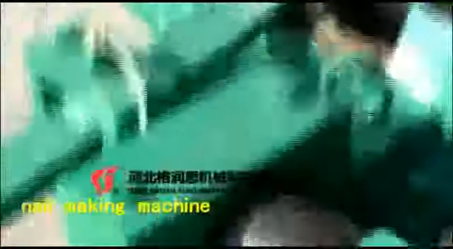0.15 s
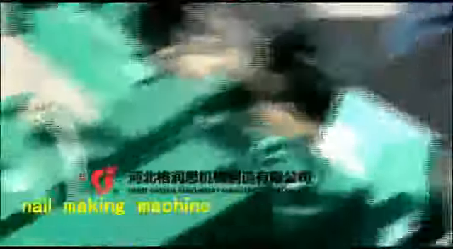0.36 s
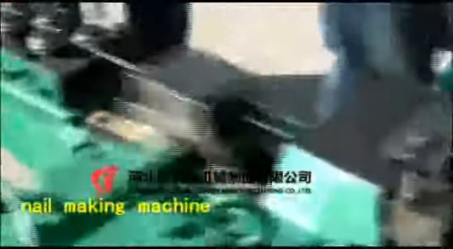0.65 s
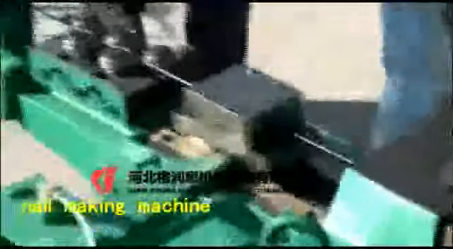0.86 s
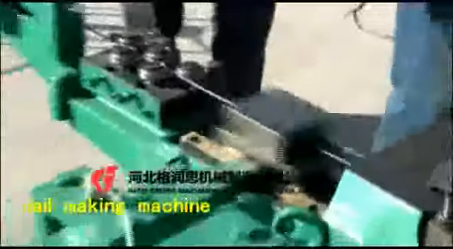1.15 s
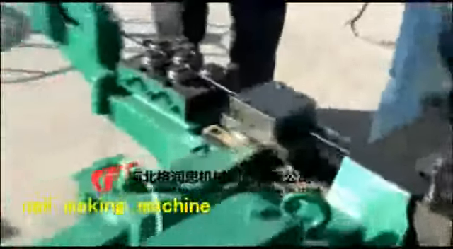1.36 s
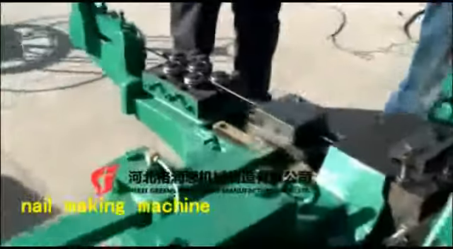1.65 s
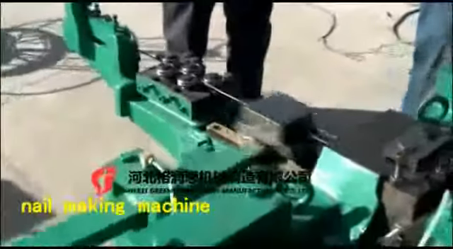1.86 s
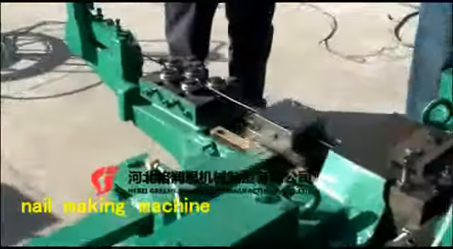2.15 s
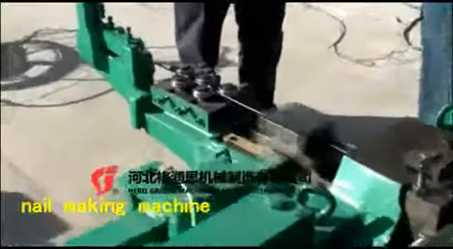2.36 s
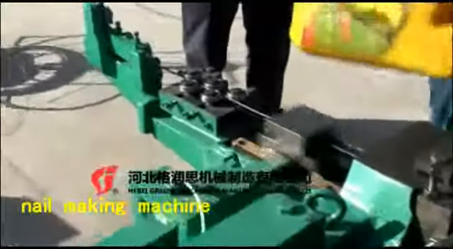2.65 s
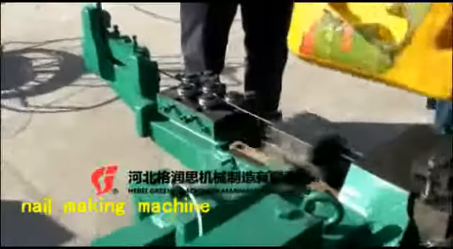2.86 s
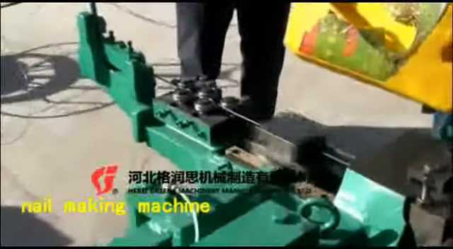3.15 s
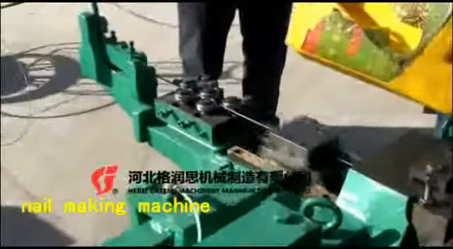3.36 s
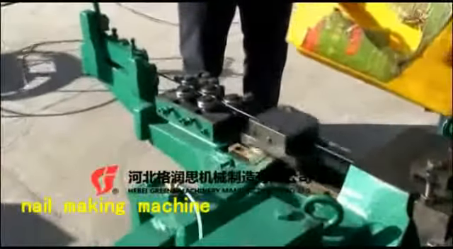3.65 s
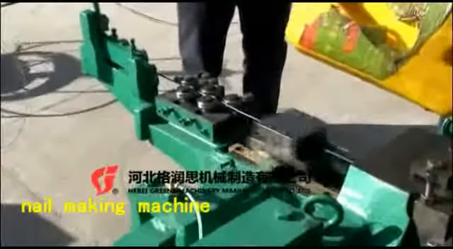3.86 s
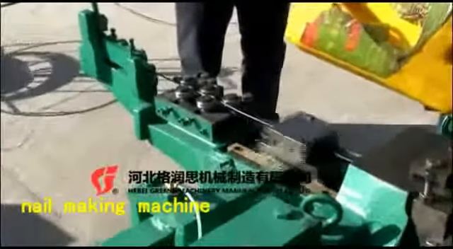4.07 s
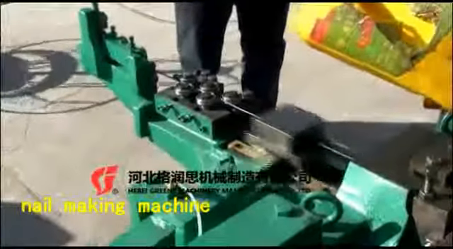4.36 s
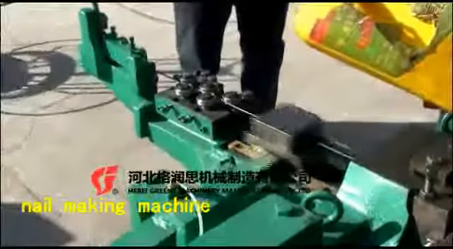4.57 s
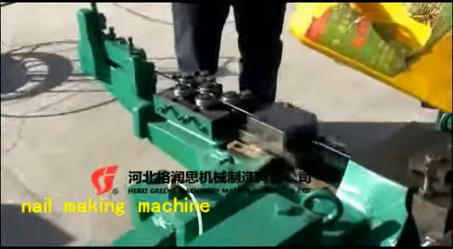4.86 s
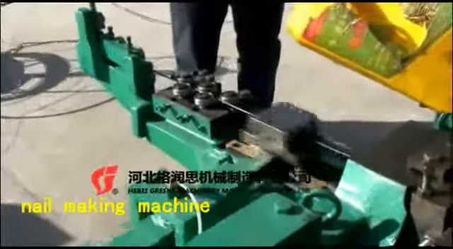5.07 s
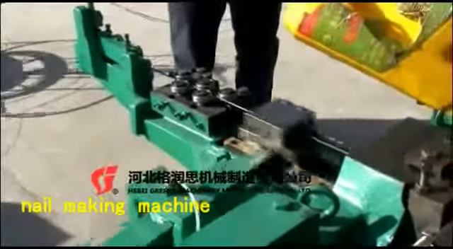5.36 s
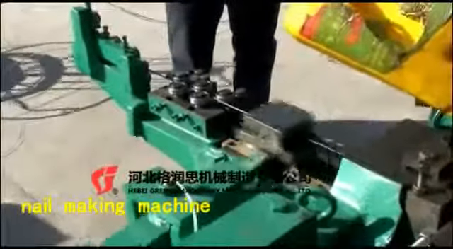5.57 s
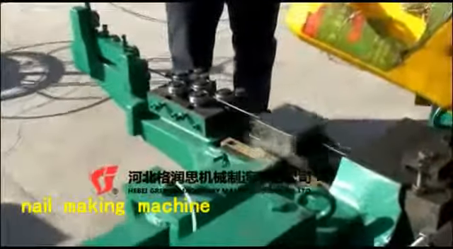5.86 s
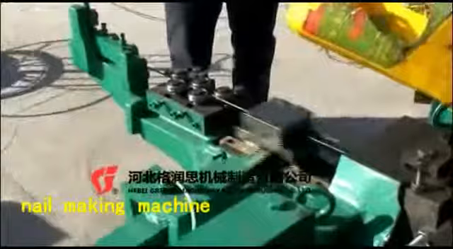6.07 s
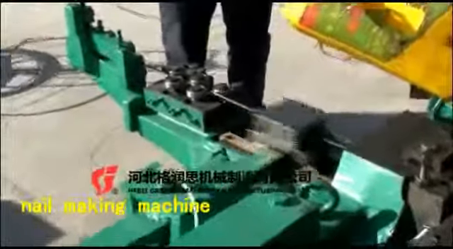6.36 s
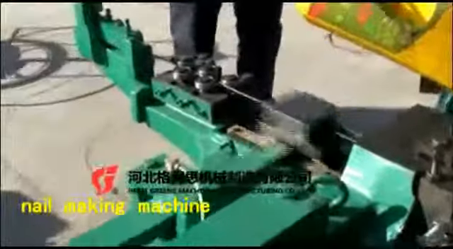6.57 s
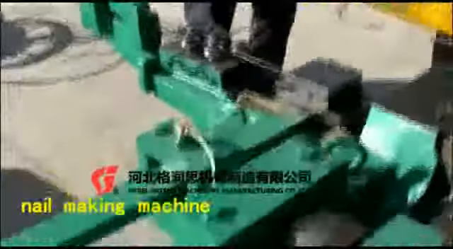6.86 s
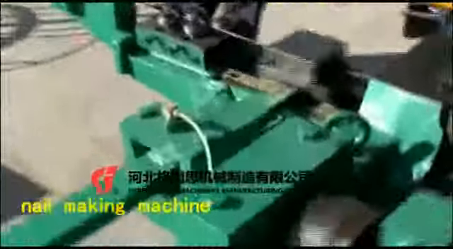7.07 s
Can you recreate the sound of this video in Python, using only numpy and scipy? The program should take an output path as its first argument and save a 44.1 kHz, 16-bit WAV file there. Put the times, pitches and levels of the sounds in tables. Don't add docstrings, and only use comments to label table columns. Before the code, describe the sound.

A wire nail machine clatters steadily outdoors, about four hard punch-and-snip cycles a second over rattling gears, whining rollers and rumbling wind.

```python
import sys
import numpy as np
from scipy import signal
from scipy.fft import rfft, irfft
from scipy.io import wavfile
from scipy.ndimage import uniform_filter1d

SR = 44100
rng = np.random.default_rng(int(sys.argv[2]) if len(sys.argv) > 2 else 0)


def int16_out(signal):
    q = np.round(np.clip(np.atleast_2d(signal).T, -1, 1) * 32767)
    wavfile.write(sys.argv[1], SR, q.astype(np.int16))


def magnitude_from_level(level_db):
    exponent = np.asarray(level_db, float) / 20
    return 10 ** exponent


N = 318843
HZ = np.fft.rfftfreq(N, 1 / SR)
T = np.arange(N) / SR
TURN_S = .2360


def evened(x):
    return x / np.sqrt(np.mean(x ** 2) + 1e-20)


def read(points, hz):
    f, value = np.transpose(points)
    return np.interp(np.log(hz + 1), np.log(f + 1), value)


def shaped_noise(points):
    return evened(irfft(rfft(rng.standard_normal(N)) * magnitude_from_level(read(points, HZ)), N))


def wander(rate_hz):
    return evened(irfft(rfft(rng.standard_normal(N)) / (1 + (HZ / rate_hz) ** 2), N))


def add(mix, s, sound):
    at = round(s * SR)
    part = mix[max(at, 0):][:max(len(sound) + min(at, 0), 0)]
    part += sound[max(-at, 0):][:len(part)]


def resonate(x, hz, width):
    turn = np.exp(2j * np.pi * np.cumsum(hz * np.ones(N)) / SR)
    r = np.exp(-np.pi * width / SR)
    return 2 * (turn * signal.lfilter([1 - r], [1, -r], x / turn)).real


def ring(modes, detune, rise):
    t = np.arange(9000) / SR
    tones = np.zeros(len(t))
    for (hz, db, t60), factor in zip(modes, detune):
        tones += magnitude_from_level(db - 60 * t / t60) * np.sin(2 * np.pi * hz * factor * t)
    return tones * (1 - np.exp(-t / rise))


def crank():
    first_turn_s = .0105
    starts = np.arange(first_turn_s - TURN_S, N / SR, TURN_S)
    return starts, (T - first_turn_s) % TURN_S


def near(s):
    # time [s], level [dB].
    effort = [(0, -16), (1.5, -16), (3, -16.5), (4.5, -17), (6, -17.5), (7.23, -16.5)]
    at, db = np.transpose(effort)
    return np.interp(s, at, db) - db.mean()


def strokes(starts, at, db, vary_db):
    # time [s], extra level [dB].
    odd = [(.42, -4), (.66, 2), (1.13, 2), (1.69, -3), (1.84, -4), (2.17, 3.5), (2.55, 2.5), (3.02, -5),
           (3.11, 2), (4.05, -1.5), (4.43, 2), (4.53, 1.5), (4.76, -1.5), (5.14, -2.5), (5.38, 2),
           (5.61, 2), (5.94, 2), (6.09, 3.5), (6.65, -1.5)]
    slack_s = .0007
    late, hard = rng.standard_normal((len(starts), 2)).T
    odd_db = sum(extra_db * (abs(starts + at - s) < TURN_S / 10) for s, extra_db in odd)
    force_db = db + vary_db * np.clip(hard, -2, 2) + odd_db
    return np.transpose([starts + at + slack_s * late, force_db])


def wind(place):
    # time [s], level [dB].
    breeze = [(0, -35.5), (.4, -30.5), (1.2, -38), (1.5, -30.5), (2.0, -31), (2.5, -42.5), (2.8, -38),
              (3.7, -42), (4.0, -39), (4.12, -24.5), (4.9, -30), (5.4, -33.5), (5.66, -45.5), (5.76, -24),
              (6.1, -32), (6.5, -28), (6.9, -30), (7.23, -39.5)]
    # frequency [Hz], density [dB per Hz].
    gust = [(15, -22), (35, 1.5), (70, 4), (120, 3.5), (200, -17), (400, -41.5)]
    a, b = shaped_noise(gust), shaped_noise(gust)
    puff_at_s, puff_db = 0.093, 4.0
    pumped_db = puff_db * np.cos(2 * np.pi * (place - puff_at_s) / TURN_S)
    level = magnitude_from_level(np.interp(T, *np.transpose(breeze)) + pumped_db + 2.5 * wander(rate_hz=12))
    return level * np.array([magnitude_from_level(1.5) * a, .5 * a + .8 * b])


def load(place):
    # time into the turn [s], length [s],
    # rattle gained or lost [dB], centre [Hz], spread [octaves].
    stroke_rows = [
        (0.008, 0.01, 2.5, 400, 1.3),
        (.045, .022, 6.5, 1200, 3.0),
        (.08, .028, 4.5, 900, 1.5),
        (.165, .02, 3, 4100, 0.88),
        (.18, .009, 7.5, 4500, 1.1),
        (.215, .022, 3.5, 2200, 1.3),
        (.182, 0.01, -4, 300, 1.2),
        (.145, 0.015, 2, 5500, .9),
    ]
    # Low, middle and high rattle between strokes [dB].
    idle_db = (-2.5, -4, -2.5)
    centres = (400, 1500, 4200)
    out = np.outer(idle_db, np.ones(N))
    for at, length, db, hz, spread in stroke_rows:
        off = (place - at + TURN_S / 2) % TURN_S - TURN_S / 2
        share = np.exp(-(np.log2(np.divide(centres, hz)) / spread) ** 2)
        out += db * np.outer(share, np.exp(-(off / length) ** 2))
    return out


def rattle(place, load_db):
    # frequency [Hz], density [dB per Hz].
    spectrum = [(59, -43.5), (100, -37.5), (161, -12.5), (283, -9), (347, -5.5), (464, -7), (580, -4),
                (736, -6), (829, -9.5), (3190, -19), (5420, -31.5), (5900, -66.5), (7670, -67),
                (13000, -120)]
    # frequency [Hz], width [Hz], level [dB].
    castings = [(165, 36, -8), (254.4, 24, -14.5), (352.6, 28, -1.5), (570, 38, -7), (824, 39, -6.5),
                (1047, 56, -9.5), (1414, 27, -13.5), (2840, 29, -32), (4750, 160, -27), (5440, 80, -20.5)]
    repeats = (.8, .65, .35)
    force = magnitude_from_level(2.4 * np.minimum(rng.exponential(1, N), 5))
    ticks = force * (rng.random(N) < 4000 / SR) * rng.choice([-1, 1], N)
    fresh = evened(evened(ticks) + 1.2 * rng.standard_normal(N))
    teeth = rng.standard_normal(SR)[(place * SR).astype(int)]
    low = 1 / (1 + (HZ / 750) ** 4)
    high = 1 - 1 / (1 + (HZ / 2800) ** 4)
    drive = np.zeros(N)
    for share, db, repeat in zip((low, 1 - low - high, high), load_db, repeats):
        source = repeat * teeth + np.sqrt(1 - repeat ** 2 + 1e-9) * fresh
        flutter_db = wander(rate_hz=29)
        drive += irfft(rfft(source * magnitude_from_level(db + flutter_db)) * share, N)
    broad = evened(irfft(rfft(drive) * magnitude_from_level(read(spectrum, HZ)), N))
    body = evened(sum(magnitude_from_level(db) * evened(resonate(drive, hz, width)) for hz, width, db in castings))
    return magnitude_from_level(-16) * (magnitude_from_level(-0.8) * broad + magnitude_from_level(-4.0) * body)


def loose(load_db):
    pings_per_s = 13
    out = np.zeros(N)
    odds = pings_per_s / SR * magnitude_from_level(1.5 * load_db)
    for hz in np.geomspace(1200, 5600, num=18):
        hits = (rng.random(N) < odds) * magnitude_from_level(3.8 * rng.standard_normal(N))
        db = -6.5 * np.log2(hz / 1200)
        ping = ring([(hz, db, .07), (hz * 1.04, db - 3, .05)], [1, 1], .002)
        out += signal.oaconvolve(hits, ping[:4000])[:N]
    return magnitude_from_level(-25.5) * evened(out)


def whine(place, rows, width, upper, upper_db):
    at, hz, db = np.transpose(rows)
    pitch = np.interp(place, at, hz)
    rub = rng.standard_normal(N)
    tone = evened(resonate(rub, pitch, width))
    tone += magnitude_from_level(upper_db) * evened(resonate(rub, pitch * upper, width))
    return tone * magnitude_from_level(np.interp(place, at, db) + 2.0 * wander(rate_hz=5.2))


def feed_rollers(place):
    # time into the turn [s], whine [Hz], level [dB].
    rows = [(0, 934, -27.5), (0.029, 826, -49.5), (0.141, 637, -41), (0.159, 705, -24.5),
            (0.169, 768, -25.5), (0.183, 841, -22), (.2, 877, -23), (.222, 913, -34), (.236, 892, -22.5)]
    return whine(place, rows, width=45, upper=1.22, upper_db=-3.5)


def slide_squeal(place):
    # time into the turn [s], squeal [Hz], level [dB].
    rows = [(0, 2320, -65.5), (0.08, 2180, -39.5), (0.094, 2252, -29), (.138, 2247, -27.5),
            (.155, 2197, -55), (.236, 2280, -60)]
    return whine(place, rows, width=16, upper=1.1, upper_db=-13)


def scrape(starts):
    level, t = np.zeros(N), np.arange(2600) / SR
    for s, db in strokes(starts, .1760, db=-27, vary_db=5.0):
        add(level, s - .045, magnitude_from_level(db) * np.sin(np.pi * t / t[-1]) ** 0.63)
    hiss = shaped_noise([(2000, -26.5), (3200, -5.5), (4200, -3.5), (5500, 2.5)])
    return level * hiss * magnitude_from_level(4.5 * wander(rate_hz=120))


def frame(starts):
    # time into the turn [s], mode [Hz], level [dB], t60 [s], rise [s].
    knocks = [(.008, 165, -16.5, 0.055, 0.017), (0.014, 353, -8.5, 0.052, 0.0029),
              (.040, 355, 0.5, 0.28, 0.005), (.060, 827, -5.5, 0.043, .003), (.064, 165, -2, 0.18, 0.006),
              (0.063, 252, -5.5, 0.39, 0.019), (.080, 345.2, 2, 0.15, 0.0021),
              (.100, 579.4, -1, 0.14, 0.0038), (.100, 831, -12, 0.034, 0.0023),
              (.115, 165, -17, 0.086, .008), (.130, 355, -17.5, 0.11, 0.0036),
              (.135, 583, -5.5, 0.17, 0.0021), (.190, 584, -9, 0.083, 0.0056),
              (0.189, 168, -2.5, 0.084, 0.011), (0.211, 360, -10.5, 0.14, .006)]
    bed_hz, bed_db_per_s = 300, -.5
    out = np.zeros(N)
    for start, force_db in strokes(starts, 0, -11.5 + 1.5 * near(starts), vary_db=0.8):
        chance = rng.standard_normal((len(knocks), 2))
        for (at, hz, db, t60, rise), (late, vary) in zip(knocks, chance):
            knock_db = db + force_db + 1.2 * vary + bed_db_per_s * start * (hz < bed_hz)
            add(out, start + at + 0.00056 * late, ring([(hz, knock_db, t60)], [1], rise))
    return out


def blows(rows, modes, lead, crack_db, crack_s, rise=0.00046):
    out, t = np.zeros(N), np.arange(9000) / SR
    for s, db in rows:
        chance = rng.standard_normal((2, len(modes)))
        struck = np.array(modes) + np.outer(1.5 * chance[0], [0, 1, 0])
        crack = magnitude_from_level(crack_db) * rng.standard_normal(len(t)) * np.exp(-t / crack_s)
        add(out, s + lead, magnitude_from_level(db) * (ring(struck, 1 + .008 * chance[1], rise) + crack))
    return out


def grip(starts):
    # mode [Hz], level [dB], t60 [s].
    modes = [(5490, 5.6, 0.063), (3930, 7, 0.05)]
    return blows([(s + .020, -27) for s in starts[1:]], modes, 0, -4.0, 0.0037)


def cutter(starts):
    # mode [Hz], level [dB], t60 [s].
    modes = [(1830, -10, 0.08), (3237, 7, 0.0056), (4174, -2, 0.01), (5120, -6, 0.0067), (5230, -13, 0.013)]
    cuts = strokes(starts, .1760, -8 + 0.23 * starts, vary_db=1.0)
    return blows(cuts, modes, 0.00028, -0.93, 0.0018)


def punch(starts):
    # mode [Hz], level [dB], t60 [s].
    punch_modes = [(608, 5.5, .05), (680, 0, 0.012), (799, -6.5, 0.092), (1912, -3, 0.079),
                   (2627, -10.5, 0.3), (3130, -14.5, 0.32), (3880, -17, 0.39), (4770, -19, 0.12)]
    # mode [Hz], level [dB], t60 [s].
    housing_modes = [(1429, 8.5, 0.077), (1367, 2, 0.06)]
    punches = strokes(starts, .0318, -12 + 1.2 * near(starts), vary_db=1)
    housing = blows(punches, housing_modes, 0, -39.5, .004, rise=0.0055)
    return blows(punches, punch_modes, -.0003, -6.5, 0.011) + housing


def ports(x, direct):
    # frequency [Hz], left-right likeness [0 to 1].
    likeness = [(60, 0.27), (130, 0.88), (270, 0.74), (580, 0.92), (1230, 0.54), (2630, 0.49), (5590, 0.14)]
    # frequency [Hz], left over right [dB].
    balance = [(60, 4.5), (110, 3.5), (220, -6), (420, -4.5), (800, -4), (1530, -6.5), (2920, -4.5),
               (5590, -9.5)]
    z = signal.stft(x, nperseg=384)[2]
    z = z * np.exp(2j * np.pi * rng.random(z.shape))
    scattered = evened(signal.istft(z, nperseg=384)[1][:N]) * x.std()
    same = np.clip(read(likeness, HZ), 0, 1) ** .6
    spectrum, straight = rfft(x), rfft(direct)
    left = spectrum * same
    left += np.sqrt(1 - same ** 2) * rfft(scattered) / (1 + (170 / (HZ + 1)) ** 4)
    tilt = magnitude_from_level(read(balance, HZ) / 2)
    return irfft(np.array([(left + magnitude_from_level(-4.5) * straight) * tilt, (spectrum + straight) / tilt]), N)


def scene():
    starts, place = crank()
    load_db = load(place)
    steady = rattle(place, load_db) + feed_rollers(place) + slide_squeal(place) + grip(starts)
    machine = steady * magnitude_from_level(near(T)) + loose(load_db[1]) + scrape(starts) + frame(starts)
    return ports(machine, cutter(starts) + punch(starts)) + wind(place)


def starved(x):
    # frequency [Hz], step [dB].
    coarse = [(100, -28), (1000, -20), (2500, -17.5), (4000, -16.5), (5200, -17), (5800, -24), (6300, -40)]
    hop, bins = 1024, np.arange(304) + .5
    n = np.arange(2 * hop) + .5
    window = np.sin(np.pi * n / hop / 2)[:, None]
    basis = window * np.cos(np.pi / hop * np.outer(n + hop / 2, bins)) * np.sqrt(2 / hop)
    blocks = np.pad(x, ((0, 0), (hop, 2 * hop - N % hop))).reshape(2, -1, hop)
    lines = np.concatenate([blocks[:, :-1], blocks[:, 1:]], axis=2) @ basis
    count = lines.shape[1]
    frames_db = 5.1 * uniform_filter1d(rng.uniform(-1.3, 1.6, (count, 2)).T, size=2)[..., None]
    bands_db = 3.3 * np.repeat(rng.standard_normal((count, 2, 19)), 16, axis=2).transpose(1, 0, 2)
    step = magnitude_from_level(read(coarse, bins * SR / hop / 2) + frames_db + bands_db)
    frames = (np.sign(lines) * np.floor(abs(lines) / step + 0.31) * step) @ basis.T
    return (frames[:, :-1, hop:] + frames[:, 1:, :hop]).reshape(2, -1)[:, :N]


def low_pass(x):
    return signal.sosfilt(signal.butter(12, 15900, fs=SR, output="sos"), x)


def record(dry):
    squeezed = 1.612 * np.tanh(dry / 1.616)
    band = signal.firwin(141, 5668, window=("kaiser", 7), fs=SR)
    thin = starved(signal.oaconvolve(squeezed, band[None], "same", axes=1))
    return low_pass(np.clip(thin, -.99, .99))


dry = scene()
out = record(dry)
int16_out(out)
```